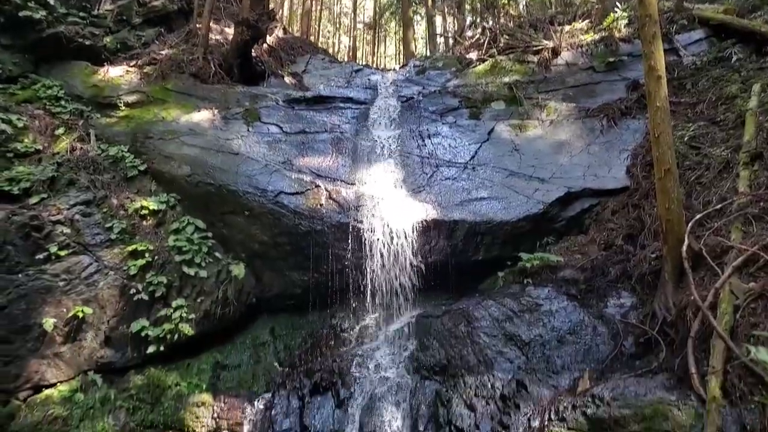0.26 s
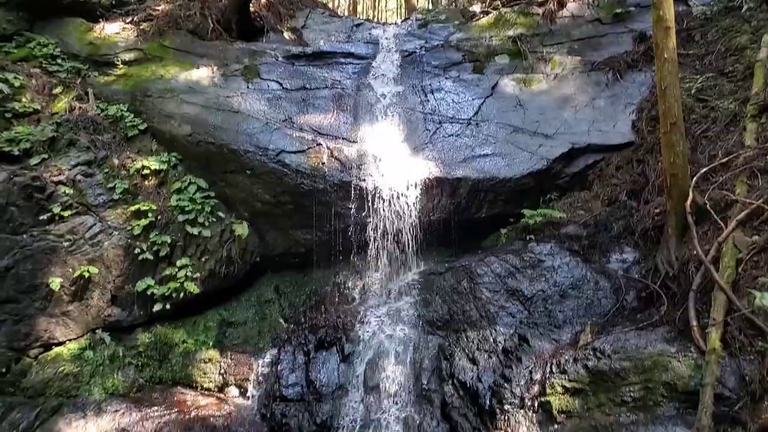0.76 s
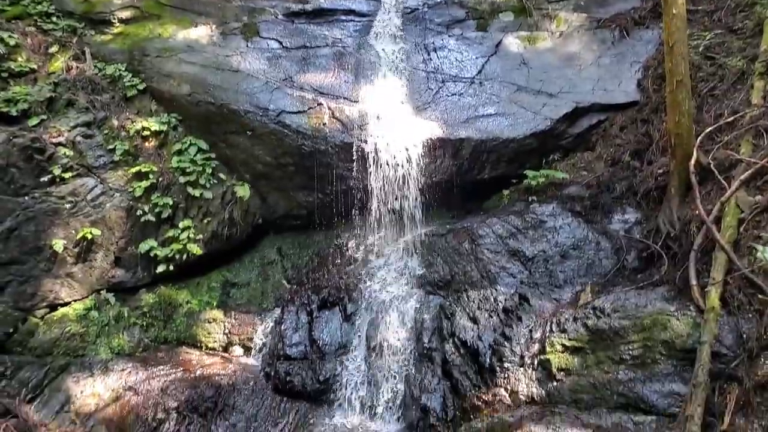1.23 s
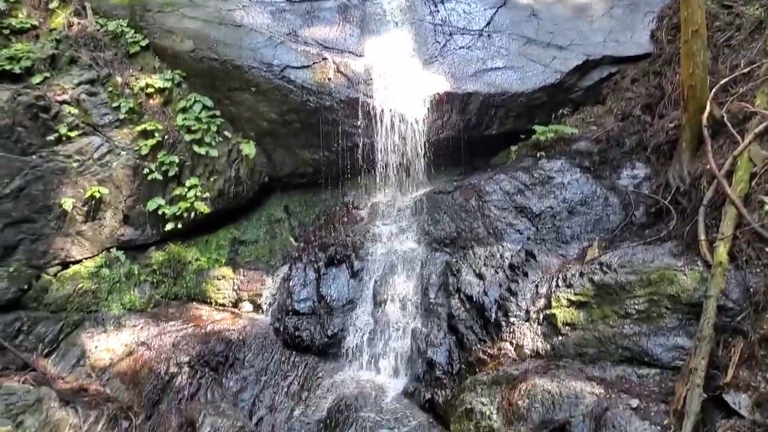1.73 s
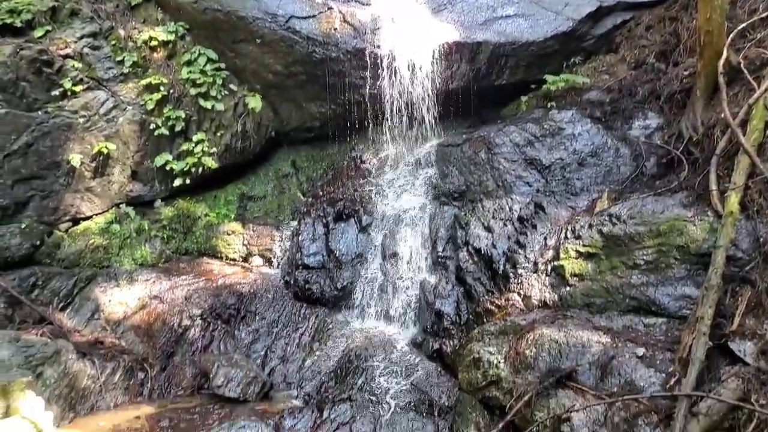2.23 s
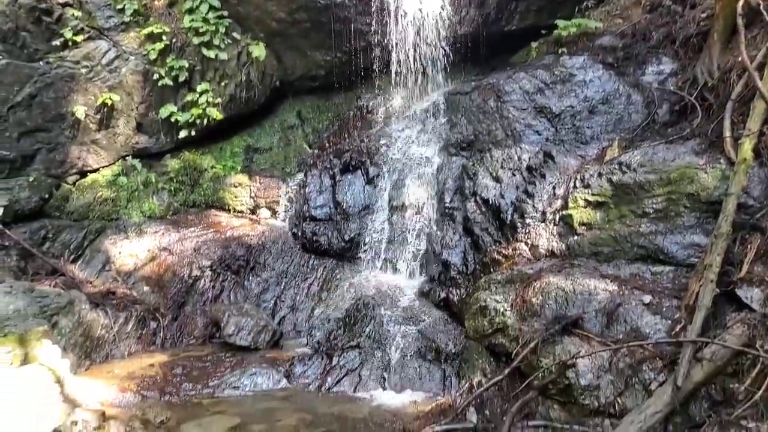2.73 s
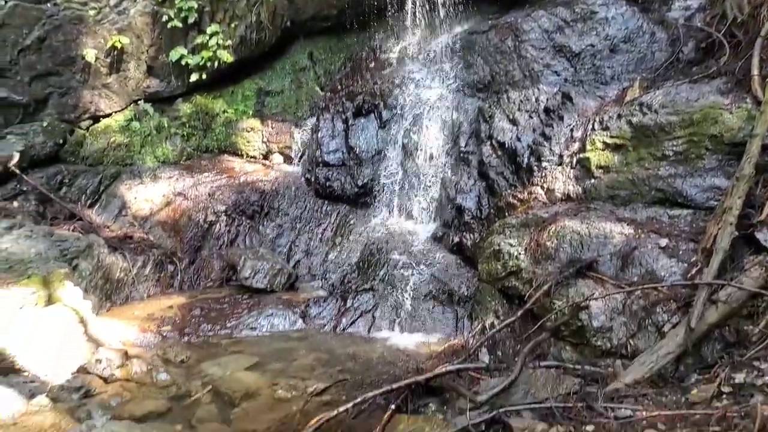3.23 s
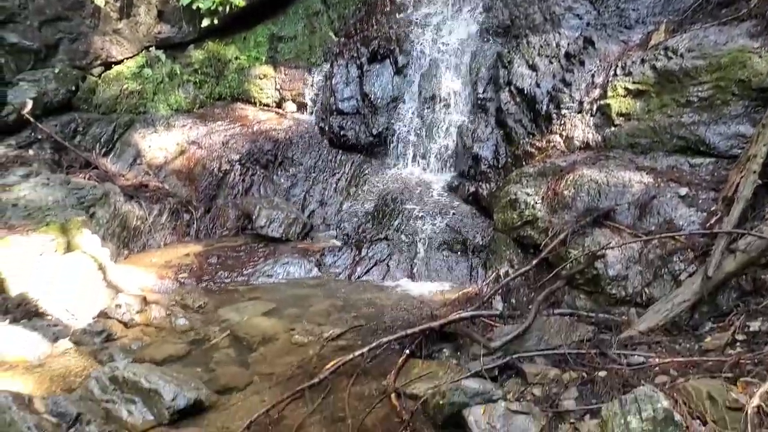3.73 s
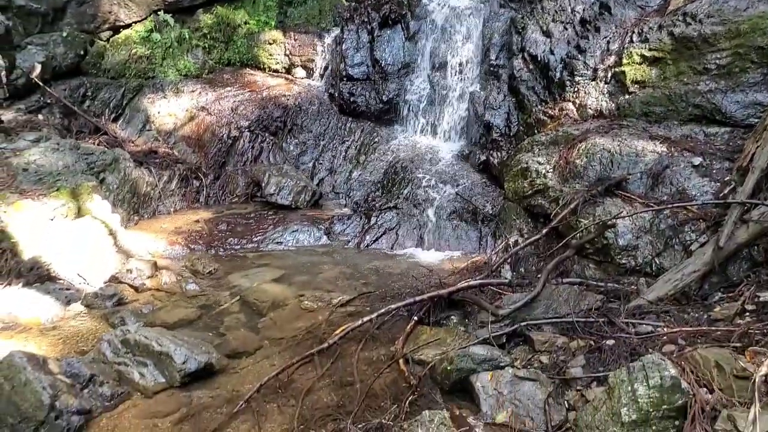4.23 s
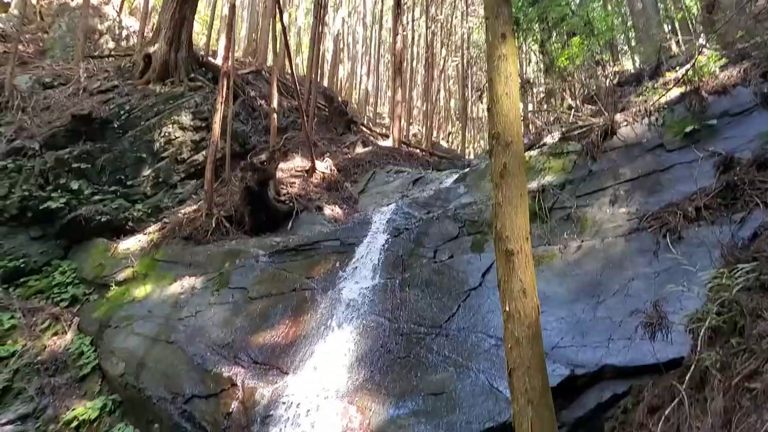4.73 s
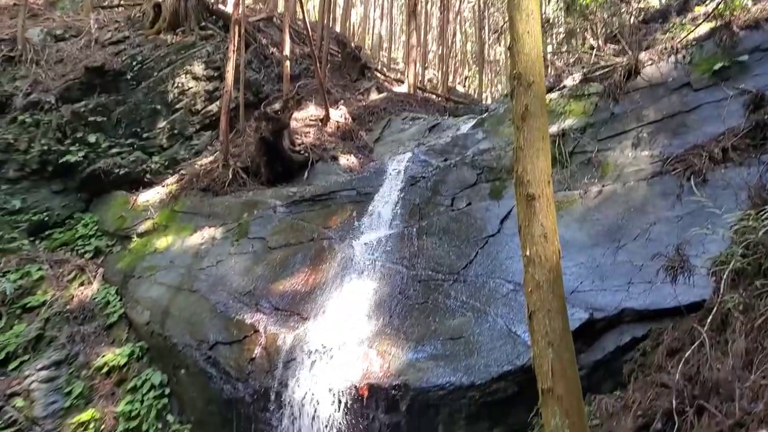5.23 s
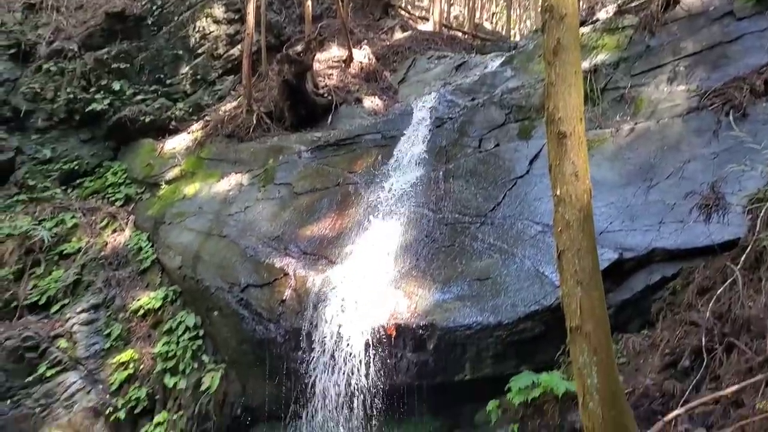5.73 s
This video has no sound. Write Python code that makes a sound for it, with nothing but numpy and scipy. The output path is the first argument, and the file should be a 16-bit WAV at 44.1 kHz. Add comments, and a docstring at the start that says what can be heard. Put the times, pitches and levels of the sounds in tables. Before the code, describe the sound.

A small waterfall pours over rock ledges into a shallow pool in a wooded gorge. The rush starts slightly subdued, reaches full strength within a second, and stays steady with sharp splats, bubbling and small hollow gulps. At about four and a half seconds it cuts out for an instant, resumes thin and very quiet, then jumps back up and swells. Close, wide stereo outdoor pickup with little echo.

```python
"""Waterfall into a gorge pool

A thin waterfall splashes down rock ledges into a shallow pool in a wooded gorge.
The rush is noise that surges at random, with drop ticks, ringing bubbles, bursts of splats and hollow gulps.
The gaze first sinks to the pool; after a brief silent cut it faces the upper slab, quiet and then swelling."""
import sys
import numpy as np
from scipy import signal
from scipy.fft import rfft, irfft
from scipy.io import wavfile
from scipy.ndimage import uniform_filter1d

SR = 44100
rng = np.random.default_rng(int(sys.argv[2]) if len(sys.argv) > 2 else 0)


def generate_wav(signal):
    """Clip the signal to [-1, 1] and save it as 16-bit WAV at the path in sys.argv[1]."""
    frames = np.transpose(np.atleast_2d(signal))
    scaled = np.clip(frames, -1, 1) * 32767
    pcm = np.round(scaled).astype(np.int16)
    wavfile.write(sys.argv[1], SR, pcm)


N = 262836
T = np.arange(N) / SR
HZ = np.fft.rfftfreq(N, 1 / SR)
EDGE_HZ = 15620  # nothing is heard much above this pitch
FULL_DB, EBB_DB_PER_S = -18, 0.0644  # the rush at full strength, and its slow ebb
HUSH_END_S, LIFT_S = 5.29, 0.13  # facing the slab: end of the hush, and the time of the quick lift after it
# how far the left ear leads the right, for the pool and the rumble: pitch_hz, lead_radians
POOL_LEAD = [(100, -0.17), (350, -0.51), (800, 0.081), (1300, -0.11), (1800, 0.15), (2700, -0.54),
             (5000, 0.2), (7000, 0.77)]


def gain_of(db):
    """Turns decibels into amplitude."""
    return 10 ** (np.asarray(db) / 20)


def evened(x):
    """Scales a signal to an rms (average strength) of 1."""
    return x / np.sqrt(np.mean(x ** 2) + 1e-20)


def read(points, hz):
    """Reads a curve between its points, along a logarithmic pitch axis."""
    f, value = np.transpose(points)
    return np.interp(np.log(hz + 1), np.log(f), value)


def follow(rows):
    """Turns a curve of (time_s, level_db) into a gain for every sample."""
    return gain_of(np.interp(T, *np.transpose(rows)))


def bumps(rows):
    """Bell-shaped changes in dB, each as wide at half height as its length."""
    return sum(db * .5 ** ((2 * (T - s) / length) ** 2) for s, length, db in rows)


def add(mix, s, sound):
    """Adds a stereo sound at time s."""
    part = mix[:, max(round(s * SR), 0):][:, :sound.shape[1]]
    part += sound[:, :part.shape[1]]


def wander(slow_hz, fast_hz):
    """Random motion of rms 1, mostly between a slow and a fast rate."""
    without_drift = HZ / (HZ + slow_hz)
    without_jitter = 1 / np.sqrt(1 + (HZ / fast_hz) ** 2) / (1 + (HZ / (10 * fast_hz)) ** 2)
    return evened(irfft(rfft(rng.standard_normal(N)) * without_drift * without_jitter, N))


def rush(flow, surge_db=0.14, patch_db=0.9, low_patch_db=1.0):
    """Countless small impacts merge into noise; patches of pitch strengthen and weaken for a moment."""
    hz, t, z = signal.stft(rng.standard_normal((2, N)), SR, nperseg=256, noverlap=192)
    wide, narrow = rng.standard_normal((2, len(hz), len(t)))
    # smooth each random field across pitch, then across time
    wide = evened(uniform_filter1d(uniform_filter1d(wide, size=18, axis=0), size=22, axis=1))
    narrow = evened(uniform_filter1d(uniform_filter1d(narrow, size=3, axis=0), size=18, axis=1))
    low = 1 / (1 + (hz[:, None] / 3500) ** 2)  # narrow patches belong to the lower pitches
    field_db = patch_db * wide * (1 - 0.36 * low) + low_patch_db * narrow * low
    noise = signal.istft(z * gain_of(field_db), SR, nperseg=256, noverlap=192)[1][:, :N]
    return evened(noise * gain_of(surge_db * flow))


def spray(flow, per_s=3400, spread_db=3.2, clumping=.5, dull_hz=7500):
    """Drops tick on wet rock, more often when the stream surges; the film of water dulls each tick."""
    hit = rng.random((2, N)) < per_s / SR * np.exp(clumping * flow)
    size = gain_of(spread_db * np.minimum(rng.exponential(1, (2, N)), 4))
    ticks = hit * size * rng.choice([-1, 1], (2, N))
    dulling = 1 / (1 + (HZ / dull_hz) ** 2) ** 0.21
    return evened(irfft(rfft(ticks) * dulling, N))


def bubbles(per_s=1500, low_hz=450, high_hz=7500, cycles=10, rise=0.082, spread_db=2.5, count=40):
    """Small trapped bubbles ring for a few cycles, rising in pitch as they near the surface."""
    out, t = np.zeros((2, N)), np.arange(2048) / SR
    for hz in np.geomspace(low_hz, high_hz, count):
        age = t * hz / (cycles * rng.uniform(0.52, 2.07))
        fade = np.exp(-2 * age) * (1 - np.exp(-t * hz))
        ring = fade * np.sin(2 * np.pi * hz * t * (1 + rise * np.minimum(age, 2)))
        # small, high bubbles are the most common
        share = hz / (high_hz - low_hz) * np.log(high_hz / low_hz) / count
        luck = rng.random(N) / (per_s * share / SR)
        born = np.flatnonzero(luck < 1)
        train = np.zeros(N)
        train[born] = gain_of(spread_db * np.minimum(-np.log(luck[born]), 3.5))
        angle = rng.uniform(-np.pi, np.pi)  # how this pitch is shared between the two streams
        direction = np.array([np.cos(angle), np.sin(angle)])
        out += np.outer(np.sqrt(hz) * direction, signal.oaconvolve(train, ring)[:N])
    return evened(out)


def plinks():
    """Larger bubbles ring on for more cycles, as clear little notes."""
    return bubbles(per_s=110, low_hz=330, high_hz=4200, cycles=32, rise=0.0605, spread_db=2.0, count=30)


def splats():
    """A lump of water bursts on the rock: a short crack of noise around one pitch."""
    # lumps of water slapping the rock:
    # start_s, peak_db, centre_hz, width_octaves, fade_s (time to fall 60 dB), left_over_right_db
    slaps = [(.7352, -7.5, 6300, 0.55, .03, 0), (1.092, -18, 450, 1.5, .06, -1),
             (1.2665, -10, 3420, 0.66, 0.055, 1), (1.5708, -7, 5620, .7, .025, -2),
             (2.2288, -12, 3100, .4, .025, 0), (3.042, -15, 2400, .8, .03, -1),
             (3.079, -21, 330, 0.71, 0.11, -2), (3.405, -25, 330, .6, .12, -2),
             (3.45, -23, 350, .7, 0.13, -2), (4.0457, -11, 3470, 0.55, .03, -2),
             (4.6269, -25, 4500, .9, .02, -6), (5.027, -23, 4000, 1, .05, -2),
             (5.3862, -20.5, 1710, .6, .05, 1), (5.4497, -17, 1680, .25, .03, 2),
             (5.628, -22, 1750, .35, .05, 0), (5.659, -21, 2070, .2, .08, -2),
             (5.885, -15.5, 1500, 0.2, 0.1, -1)]
    out, t = np.zeros((2, N)), np.arange(4096) / SR
    hz = np.fft.rfftfreq(len(t), 1 / SR)
    for s, db, centre_hz, octaves, t60, pan_db in slaps:
        noise = rng.standard_normal((3, len(t)))
        shape = 1 / (1 + (np.log2((hz + 1) / centre_hz) / octaves) ** 2)
        fade = gain_of(-60 * t / t60) * (1 - np.exp(-t * centre_hz))
        burst = irfft(rfft(noise[:2] + noise[2]) * shape) * fade  # the third noise is common to both ears
        burst /= abs(burst.mean(0)).max()
        add(out, s, gain_of(db) * burst * gain_of([[pan_db / 2], [-pan_db / 2]]))
    return out


def gulps(rise=0.83, onset=0.0047):
    """A large air pocket swells (onset in s), rings and glides up a little (rise per s)."""
    # air pockets ringing in the water: start_s, peak_db, pitch_hz, fade_s (time to fall 60 dB)
    pockets = [(.243, -26.5, 1094, 0.047), (.744, -23, 435, 0.055), (.808, -23.5, 591, 0.063),
               (1.655, -36, 201, .12), (3.086, -23, 176, 0.08), (4.155, -29, 212, 0.066),
               (4.478, -27, 528, 0.055), (4.868, -43, 523, 0.045), (5.06, -51, 193, 0.16),
               (5.94, -31, 570, 0.079)]
    out, t = np.zeros((2, N)), np.arange(SR // 4) / SR
    for s, db, hz, t60 in pockets:
        swell = (1 - np.exp(-t / onset)) ** 2 * gain_of(-60 * t / t60)
        ring = gain_of(db) * swell / swell.max() * np.sin(2 * np.pi * hz * t * (1 + rise * t))
        add(out, s, ring * gain_of([[-1], [1]]))  # a little to the right
    return out


def ledges(x, t60=0.11, wet_db=-7):
    """The rock walls scatter each sound into a short tail that falls 60 dB in t60 seconds."""
    t = np.arange(8192) / SR
    echoes = rng.standard_normal((2, len(t))) * (rng.random((2, len(t))) < 2000 / SR)
    taps = echoes * gain_of(-60 * t / t60)
    # each stream's tail goes to the other stream
    tail = signal.oaconvolve(x[::-1], taps / np.linalg.norm(taps[0]), axes=1)[:, :N]
    return x + gain_of(wet_db) * tail


def facing(water, colour, like, lead, tilt):
    """Colours two unrelated streams and blends them into two ears; the middle of both has rms 1."""
    # the hollow under the overhang rings low, and the treble ripples: pitch_hz, width_hz, change_db
    resonances = [(173, 26, 4), (8020, 790, -3), (13200, 830, -1), (14800, 1100, 1)]
    a, b = rfft(water)
    same = np.clip(read(like, HZ), 0, 1)
    right = gain_of(-read(tilt, HZ))
    turn = np.exp(-1j * read(lead, HZ))
    centre = np.sqrt(1 + right ** 2 + 2 * right * same * turn.real)  # keeps the colour of both ears together
    ringing_db = sum(db / (1 + (2 * (HZ - hz) / width) ** 2) for hz, width, db in resonances)
    colour_gain = gain_of(read(colour, HZ) + ringing_db)
    right_ear = right * turn * (same * a + np.sqrt(1 - same ** 2) * b)
    z = np.array([a, right_ear]) * colour_gain / centre
    heard = irfft(z.mean(0) * (HZ < EDGE_HZ), N)
    return irfft(z, N) / heard.std()


def sinking_view(water):
    """The water's colour and stereo width while the gaze sinks from ledge to pool."""
    # colour of the water facing the middle ledge, the foot of the fall and the pool: pitch_hz, level_db
    ledge_colour = [(60, -29), (115, -17.5), (180, -5), (290, -7.5), (380, -4.5), (490, -5.5), (610, -3.2),
                    (750, -7.5), (950, -4.5), (1500, -2), (2050, 0.2), (2800, -2), (3600, -1), (4900, -4),
                    (6600, -1.7), (8000, -6), (9800, -6), (12500, -7.5), (15500, -5)]
    foot_colour = [(60, -39), (115, -18), (180, -6.5), (290, -7), (380, -3), (490, -5.5), (600, -3.5),
                   (750, -6), (1050, -3.5), (1400, -2.1), (1850, 0.5), (2550, -2.5), (3250, 1),
                   (3750, -0.3), (4700, -3.5), (6700, -1), (8000, -4.5), (15500, -8)]
    pool_colour = [(60, -39), (115, -14), (180, -4.5), (285, -8), (370, -4.5), (460, -3.5), (750, -6),
                   (950, -3), (1150, -6), (1380, 0.2), (1550, -3), (1800, 0.3), (2300, -2.5), (3300, 1),
                   (4600, -3.5), (6500, -3), (7800, -4), (9700, -7), (12000, -5.5), (15500, -8.5)]
    # likeness of the two ears: pitch_hz, likeness (0-1, higher values count as 1)
    pool_like = [(70, 1), (170, 1.34), (500, 0.72), (800, .5), (1300, 0.22), (2000, 0.5), (2700, 0.2),
                 (4500, 0.09), (6300, 0.2), (8000, 0.05), (14000, 0)]
    # left ear against right: pitch_hz, left_over_right_db
    pool_tilt = [(60, -2.5), (92, 3), (140, -1), (210, -3), (330, -2.0), (500, -2), (770, -1.5),
                 (1170, -1.5), (1790, 0.5), (2740, -5), (4190, -3), (6410, -3), (9810, -1), (15000, 4)]
    # when the gaze meets the ledge, the foot and the pool: time_s
    gaze_s = [0.9, 2.1, 3.8]
    colours = (ledge_colour, foot_colour, pool_colour)
    views = [facing(water, colour, pool_like, POOL_LEAD, pool_tilt) for colour in colours]
    # each view fades in and out around its own moment
    return sum(np.interp(T, gaze_s, share) * view for share, view in zip(np.eye(len(views)), views))


def slab_view(water):
    """The water's colour and stereo width facing the upper slab."""
    # colour of the water: pitch_hz, level_db
    slab_colour = [(60, -26), (125, -17), (190, -12.5), (250, -11), (400, -9.5), (620, -4), (790, -7),
                   (1250, -3.5), (1600, -1.5), (1900, -1.7), (2200, 0.5), (2650, -2.5), (3800, -0.9),
                   (5300, -3.5), (6600, -2.5), (7800, -4), (10000, -3), (15500, -2.5)]
    # likeness of the two ears: pitch_hz, likeness (0-1)
    slab_like = [(70, 0.54), (260, 0.84), (600, 0.84), (1200, 0.55), (2200, 0.29), (3300, .1), (4400, 0.27),
                 (6500, 0.24), (8000, .08), (14000, .08)]
    # how far the left ear leads the right: pitch_hz, lead_radians
    slab_lead = [(150, -0.6), (600, 0.6), (1200, -1), (2200, -1), (4500, -3), (6500, 1)]
    # left ear against right: pitch_hz, left_over_right_db
    slab_tilt = [(60, -11.5), (110, -9.5), (200, -3.5), (380, -2.5), (700, -2.5), (1290, 0.5), (2380, -4),
                 (4400, -1.5), (8120, -1.5), (15000, 1)]
    return facing(water, slab_colour, slab_like, slab_lead, slab_tilt)


def loudness():
    """Level of the rush in dB: the pool climbs to full strength; the slab, after a hush, climbs towards it."""
    # the rush swells or slackens: centre_s, length_s, change_db
    swells = [(1.42, 0.15, 1.1), (2.21, 0.23, 0.9), (3.0, 0.23, 0.6), (3.45, 0.18, -1.3), (4.9, .07, 0.1),
              (5.16, .1, -0.5), (5.3, .06, 2.5)]
    opening_db, climb_db_per_s = -23.5, 8.5  # subdued start; the climb has the same pace in both positions
    hush_db, lifted_db = -34.0, -25.5  # facing the slab: the hush, and the level after the quick lift
    full = FULL_DB - EBB_DB_PER_S * T
    opening = opening_db + climb_db_per_s * T
    lifted_s = HUSH_END_S + LIFT_S
    lift = np.interp(T, [HUSH_END_S, lifted_s], [hush_db, lifted_db])
    returning = lift + climb_db_per_s * np.maximum(T - lifted_s, 0)
    return np.minimum([opening, returning], full) + bumps(swells)


def thinned(water):
    """The hush is thin and airy; the bass fills in as the rush lifts."""
    bass_below_hz, bass_db = 280, -4.5  # change in the bass while hushed
    air_above_hz, air_db = 8200, 0.4  # change in the treble while hushed
    bass = irfft(rfft(water) / (1 + (HZ / bass_below_hz) ** 4), N)
    air = water - irfft(rfft(water) / (1 + (HZ / air_above_hz) ** 4), N)
    hushed = np.clip(1 - (T - HUSH_END_S) / LIFT_S, 0, 1)
    return water + (gain_of(bass_db * hushed) - 1) * bass + (gain_of(air_db * hushed) - 1) * air


def rumble(like=0.79, right_db=5.5):
    """The falling column pounds the rock and the pool: deep noise that throbs, stronger on the right."""
    # colour of the deep noise: pitch_hz, level_db
    rumble_colour = [(15, -24), (30, -15), (52, -2), (76, 4), (110, -5), (170, -30), (400, -70)]
    # moments when it throbs: centre_s, length_s, lift_db
    throbs = [(1.18, 0.19, 5), (2.39, 0.092, 4.5), (3.1, 0.1, 8.5), (3.43, 0.12, 6), (3.62, 0.1, 8),
              (4.44, 0.16, 8), (5.55, 0.07, 15), (5.72, 0.06, 9), (5.88, 0.09, 12.5)]
    noise = rng.standard_normal((2, N))
    low = facing(noise, rumble_colour, [(70, like)], POOL_LEAD, [(70, -right_db)])
    return low * gain_of(bumps(throbs))


def at_level(water, low, level_db, under_db=-34.5, duck=1):
    """One level drives both the water and the rumble beneath it (duck: rumble dB per dB of rush)."""
    low_db = FULL_DB + under_db + duck * (level_db - FULL_DB)
    return gain_of(level_db) * water + gain_of(low_db) * low


def scene(spray_db=-7.0, bubble_db=-11.5, plink_db=-18.5):
    """One stream of water, heard from two positions in turn."""
    # the brief silent cut between the two positions: start_s, end_s
    cut = (4.521, 4.553)
    start_s, end_s = cut
    flow = wander(slow_hz=4, fast_hz=21.7)
    drops = gain_of(spray_db) * spray(flow)
    drops = drops + gain_of(bubble_db) * bubbles() + gain_of(plink_db) * plinks()
    water = rush(flow) + ledges(drops)
    low = rumble()
    pool_db, slab_db = loudness()
    below = at_level(sinking_view(water), low, pool_db)
    above = thinned(at_level(slab_view(water), low, slab_db))
    leaving = follow([(start_s - .002, 0), (start_s + .002, -15), (start_s + .012, -26), (end_s, -90)])
    arriving = follow([(start_s, -90), (start_s + .02, -28), (end_s - .002, -15), (end_s, 0)])
    return below * leaving + above * arriving + splats() + gulps()


def record(dry):
    """Rounds off the highest peaks, with a steep treble cut before and after."""
    edge = signal.firwin(601, EDGE_HZ, window=("kaiser", 9), fs=SR)[None]
    heard = signal.oaconvolve(dry, edge, "same")
    rounded = heard / (1 + (heard / .9) ** 8) ** (1 / 8)
    return signal.oaconvolve(rounded, edge, "same")


dry = scene()
out = record(dry)
generate_wav(out)
```